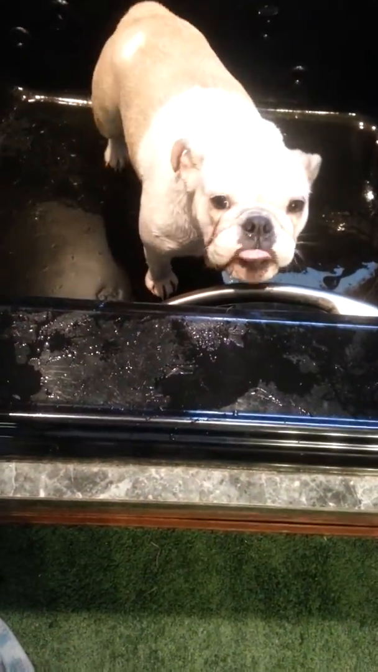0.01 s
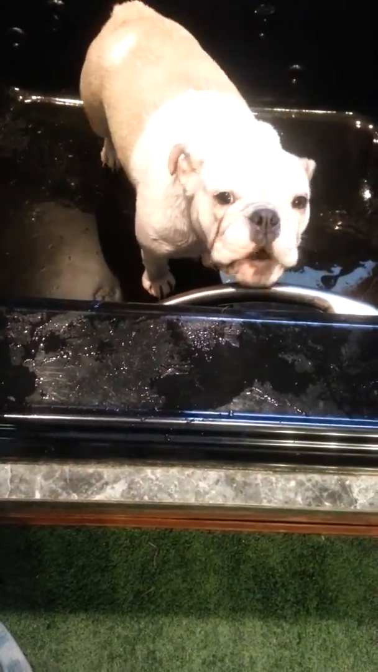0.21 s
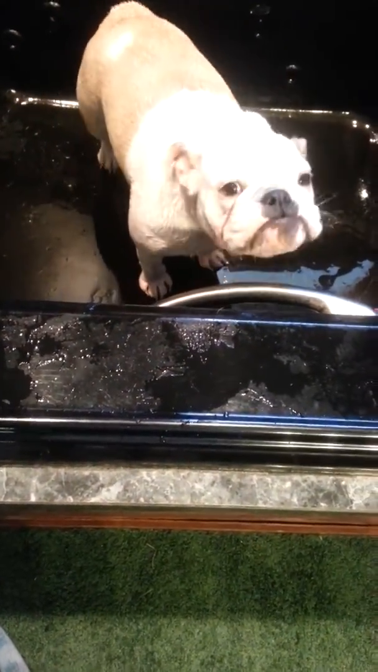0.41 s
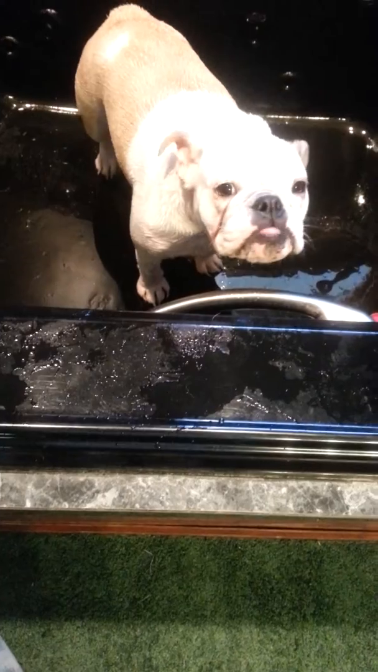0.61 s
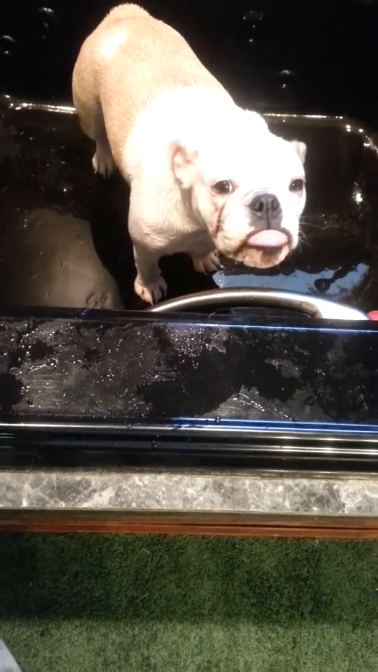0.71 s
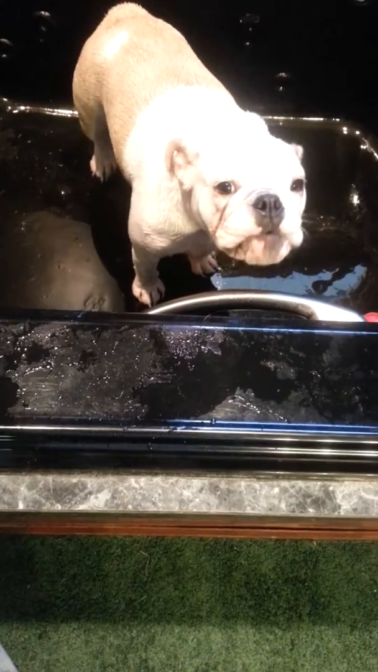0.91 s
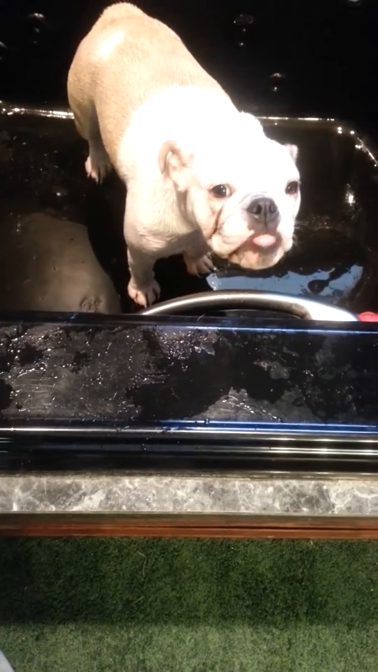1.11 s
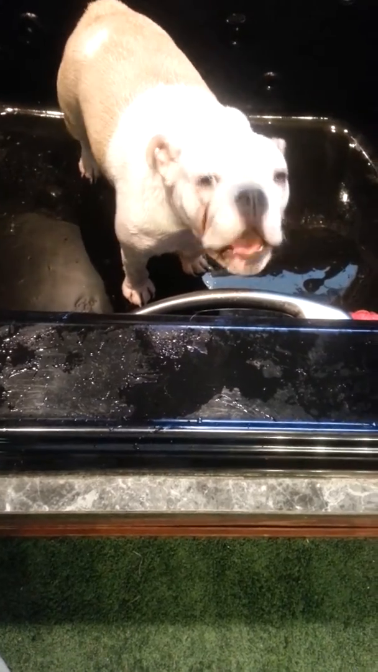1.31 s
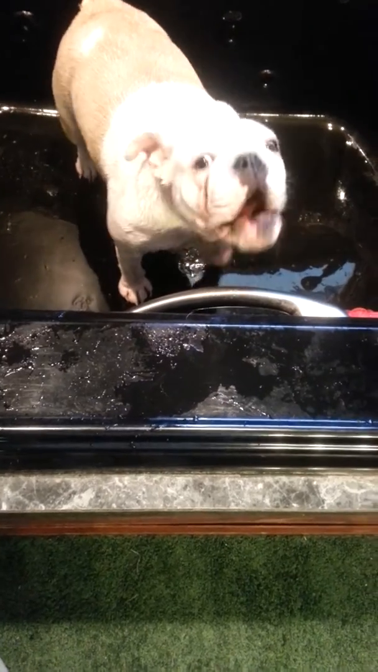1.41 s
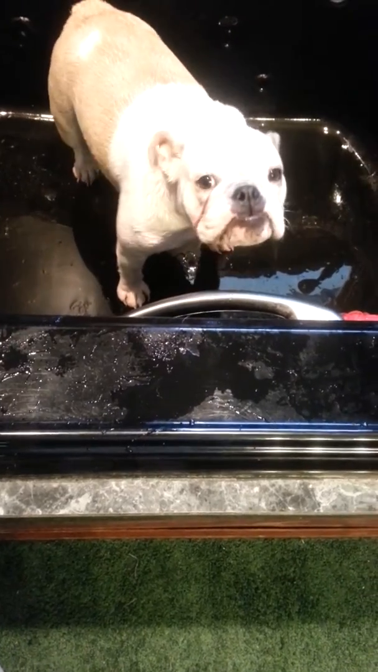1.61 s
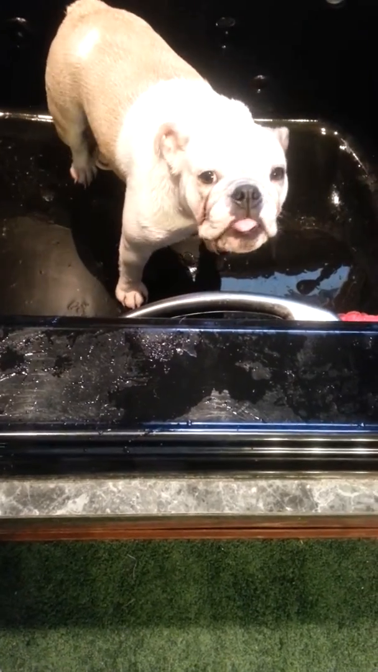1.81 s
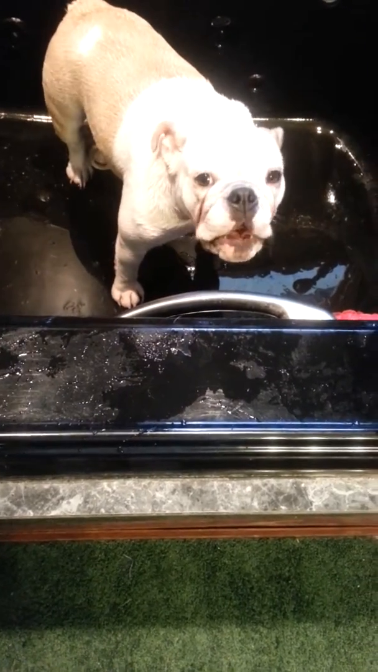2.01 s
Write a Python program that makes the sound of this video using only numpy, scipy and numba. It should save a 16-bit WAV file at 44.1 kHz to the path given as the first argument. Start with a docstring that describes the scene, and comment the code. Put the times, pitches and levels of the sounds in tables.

```python
"""In a hard-walled bathroom, a bulldog puppy yaps twice in a wet tub, close to a phone that overloads.
Each yap is a shrill, wavering tone beside a rasp of uneven pulses and air through throat resonances;
a falling squeal tops the first. Around the yaps, shaped noise makes huffs, nose whistles and paw rubs,
and decaying sines make bumps that set the tub ringing. A dense reverberant tail follows every sound,
over quiet room noise."""
import sys
import numpy as np
from scipy import signal
from scipy.fft import rfft, irfft
from scipy.io import wavfile
from numba import njit

SR = 44100
rng = np.random.default_rng(int(sys.argv[2]) if len(sys.argv) > 2 else 0)


def store_pcm(level_fs):
    """Save levels as 16-bit WAV."""
    pcm = np.round(np.clip(level_fs, -1, 1) * 32767).astype(np.int16)
    wavfile.write(sys.argv[1], SR, np.atleast_2d(pcm).T)


N = 92610  # samples, 2.1 s

# unsteadiness of the voice: pitch share, level spread, random points per second
JITTER, SHIMMER_DB, JITTER_HZ = 0.03, 5.5, 298.7
RASP_PAN_DB = 4  # left over right, for rasp and squeal


def undb(db):
    """Decibels to gain."""
    return 10 ** (np.asarray(db) / 20)


def unit(x):
    """Scale to rms 1."""
    return x / np.sqrt(np.mean(x ** 2) + 1e-18)


def pan(x, db):
    """Tip a sound to the left by db, as a level difference between the channels."""
    return x * undb(np.array([[db], [-db]]) / 2)


def band(x, hz, width):
    """One resonance, gain 1 at its centre."""
    b, a = signal.iirpeak(hz, hz / width, fs=SR)
    return signal.lfilter(b, a, x)


def steep_band(x, hz, width):
    """The same resonance twice in a row, for steeper sides."""
    return band(band(x, hz, width), hz, width)


@njit
def moving_band(x, hz, width):
    """A two-integrator resonance whose centre moves every sample, gain 1 at its centre."""
    y = np.empty(len(x))
    band_state, low_state = 0., 0.
    for i in range(len(x)):
        g = np.tan(np.pi * hz[i] / SR)
        damping = width / hz[i]
        v = (band_state + g * (x[i] - low_state)) / (1 + g * (g + damping))
        band_state = 2 * v - band_state
        low_state = low_state + 2 * g * v
        y[i] = damping * v
    return y


def highpass(x, order, hz):
    """Take away the bass below hz."""
    return signal.sosfilt(signal.butter(order, hz, "high", fs=SR, output="sos"), x)


def hiss(hz, width):
    """Steady noise in one steep resonance, rms 1."""
    return unit(steep_band(rng.standard_normal(N), hz, width))


def walk(rate):
    """Smooth chance: random points, rate per second, joined by straight lines."""
    return np.interp(np.arange(N) / SR * rate, np.arange(N), rng.standard_normal(N))


def colour(x, hz, gain):
    """Shape a spectrum by points on a log-frequency axis."""
    f = np.arange(x.shape[-1] // 2 + 1) * SR / x.shape[-1]
    curve = np.interp(np.log(f + 1), np.log(hz), gain)
    return irfft(rfft(x) * curve, x.shape[-1])


def swell(t, start, attack, decay):
    """Straight rise, then exponential fall."""
    rise = np.clip((t - start) / attack, 0, 1)
    return rise * np.exp(-np.maximum(t - start - attack, 0) / decay)


def hold(t, start, end):
    """Fade in and out over 48 ms each; a sound under 96 ms stays below full level."""
    return np.clip(np.minimum(t - start, end - t) / 0.048, 0, 1)


def ring(t, start, hz, decay):
    """One struck mode: a sine that starts at the blow and dies away."""
    age = np.maximum(t - start, 0)
    return np.sin(2 * np.pi * hz * age) * np.exp(-age / decay)


def yap(t, curve, throat, breathy, rough):
    """A wavering tone, and a rasp of uneven pulses and gated air that rings the sliding throat."""
    s, hz, tone_db, rasp_db = np.array(curve).T
    note, cycles = tone(t, s, hz, tone_db, rough)

    flaps = cycles * 0.5  # the rasp runs an octave below the tone
    pulses = np.diff(np.floor(flaps), prepend=0) * undb(SHIMMER_DB * walk(JITTER_HZ))
    air = rng.standard_normal(N) * np.exp(-(flaps % 1) / 0.4)  # strongest at each pulse
    source = unit(pulses) + breathy * unit(air)

    # a fixed hiss band, then resonances that slide for 61 ms from the third point of the curve
    rasp = undb(-19.5) * steep_band(source, 7740, 1680)
    jaw = np.clip((t - s[2]) / 0.061, 0, 1)
    for first, last, width, db in throat:
        centre = first + (last - first) * jaw
        once = moving_band(source, centre, 0.98 * width)
        rasp = rasp + undb(db) * moving_band(once, centre, 0.98 * width)
    rasp = unit(rasp) * undb(np.interp(t, s, rasp_db))

    voice = voiced(t, s) * (pan(note, -4.5) + pan(rasp, RASP_PAN_DB))
    return highpass(voice, 4, 379)


def tone(t, s, hz, db, rough):
    """A wavering note with a weak octave, returned with its count of cycles."""
    unsteady = 1 + rough * np.exp(-np.maximum(t - s[1], 0) / 0.022)  # extra roughness clears away
    pitch = np.interp(t, s, hz) * (1 + JITTER * unsteady * walk(JITTER_HZ))
    cycles = np.cumsum(pitch) / SR
    wave = np.sin(2 * np.pi * cycles) + undb(-17) * np.sin(4 * np.pi * cycles)
    shimmering = unit(wave * undb(SHIMMER_DB * walk(JITTER_HZ)))
    return shimmering * undb(np.interp(t, s, db)), cycles


def voiced(t, s):
    """The voice starts abruptly, in 3.5 ms, and lets go over the 34 ms after its last point."""
    return np.clip((t - s[0]) / 0.0035, 0, 1) * np.clip((s[-1] - t) / 0.034 + 1, 0, 1)


def squeal(t, waver):
    """A narrow, falling sine above the first yap's tone, which wavers on its own."""
    # shrill overtone: (time [s], pitch [Hz], level [dB])
    squeal_curve = [(0.261, 1859, -11.5), (.29, 1684, 4.5), (0.327, 1649, -11.5), (.385, 1585, -22)]
    s, hz, db = np.array(squeal_curve).T
    cycles = np.cumsum(np.interp(t, s, hz) * (1 + waver * walk(JITTER_HZ))) / SR
    line = unit(np.sin(2 * np.pi * cycles) * undb(SHIMMER_DB * walk(JITTER_HZ)))
    return pan(voiced(t, s) * line * undb(np.interp(t, s, db)), RASP_PAN_DB)


def huffs(t):
    """Short puffs and snuffles: swells of band noise, softened by the dog's jowls."""
    # air through nose and lips:
    # (start [s], attack [s], decay [s], level [dB], centre [Hz], width of each filter pass [Hz])
    puffs = [(0.119, 0.038, 0.029, -46.5, 1730, 3500), (0.196, 0.0011, 0.05, -36, 2240, 1790),
             (0.418, 0.068, 0.028, -23, 4440, 6000), (0.774, 0.0011, 0.02, -28, 4100, 8910),
             (0.782, 0.055, 0.073, -37, 2500, 4410), (0.936, .015, .025, -49, 3400, 5040),
             (1.299, 0.001, .025, -29.5, 4350, 2200), (1.519, 0.063, 0.029, -26.5, 5200, 4900),
             (1.656, 0.046, 0.034, -32, 5400, 7100), (1.67, 0.053, 0.011, -39, 1300, 580),
             (1.62, 0.1, 0.019, -37.5, 453, 162), (1.298, 0.00045, .018, -20.5, 865, 596)]
    air = 0
    for start, attack, decay, db, hz, width in puffs:
        air = air + undb(db) * swell(t, start, attack, decay) * hiss(hz, width)
    return signal.sosfilt(signal.butter(2, 10360, fs=SR, output="sos"), air)


def whistles(t):
    """Air whistling faintly in the dog's short nose: very narrow bands of noise."""
    # nose whistles: (start [s], end [s], pitch [Hz], level when fully faded in [dB])
    nose_notes = [(0.786, 0.855, 1696, -36.5), (0.88, 0.92, 2470, -37.5), (1.033, 1.296, 2530, -61.5)]
    return sum(undb(db) * hiss(hz, 130) * hold(t, start, end) for start, end, hz, db in nose_notes)


def bumps(t):
    """Soft knocks with a wet click; each has its own note and sets the tub's modes ringing."""
    # knocks of paws and jowls: (time [s], level [dB], ring [Hz], decay [s])
    knocks = [(0.025, -33.5, 550, 0.0024), (0.194, -28, 585, 0.017), (0.405, -27, 305, 0.018),
              (0.794, -35, 819, 0.025), (.817, -26.5, 752, 0.011), (0.877, -22.5, 568, 0.0099),
              (.957, -27.5, 437, 0.006), (1.03, -42.5, 256, 0.02), (1.486, -20.5, 299, 0.017)]
    # modes of the tub: (frequency before detuning [Hz], decay [s], level [dB])
    tub_modes = [(238, 0.0092, -9), (283, 0.024, -2.5), (450, 0.011, -7.5), (880, .014, -10.5)]
    tub_db, click_db = -4, -9  # against the knock's own note
    tub_detune = 0.079  # each place on the tub rings a little differently
    out = 0
    for start, db, hz, decay in knocks:
        tub = 0
        for mode_hz, fade, mode_db in tub_modes:
            detuned = mode_hz * (1 + tub_detune * rng.standard_normal())
            tub = tub + undb(mode_db) * ring(t, start, detuned, fade)
        click = hiss(3600, 4500) * swell(t, start, 0.00073, 0.0042)
        knock = ring(t, start, hz, decay) + undb(tub_db) * tub + undb(click_db) * click
        out = out + undb(db) * knock
    return highpass(out, 3, 170)


def rubs(t):
    """Faint groans of pads on the wet tub: noise in low bands, faded in and out."""
    # paw rubs: (start [s], end [s], pitch [Hz], width of each filter pass [Hz], level [dB])
    groans = [(0.795, 1.059, 268.4, 112, -42), (1.67, 2.15, 166.7, 44.4, -55),
              (1.888, 2.19, 640, 453, -59.5)]
    return sum(undb(db) * hiss(hz, width) * hold(t, start, end) for start, end, hz, width, db in groans)


def bathroom(x, t):
    """Direct sound reaches the right port first; dense reflections follow, alike in the bass only."""
    # reverberation by band: (centre [Hz], time to fall 60 dB [s], level [dB])
    room_bands = [(103, 0.043, -7.5), (288.4, 0.47, -7), (700, 0.41, -0.5), (1522, 0.39, 0),
                  (3217, 0.34, -0.5), (6000, 0.43, -8), (11800, 0.22, -1.5)]
    direct_db, wet_db = -2.5, -0.5
    port_lag_s, alike_hz = 0.00013, 447.4  # left port's delay; the channels differ fully above alike_hz
    hz, t60, db = np.array(room_bands).T
    mid, side = rng.standard_normal((2, N))
    tail = 0
    for k, own_band in enumerate(np.eye(len(hz))):
        apart = min(hz[k] / alike_hz, 1)
        pair = (mid + apart * side * np.array([[1], [-1]])) / np.hypot(1, apart)
        tail = tail + undb(db[k]) * colour(pair, hz, own_band) * np.exp(-np.log(1000) * t / t60[k])
    build = np.clip(t / 0.003, 0, 1)  # reflections gather over 3 ms
    tail = tail * build / np.sqrt(SR * t60.mean() / np.log(10 ** 6))  # level by the mean decay
    direct = np.array([np.interp(t - port_lag_s, t, x[0]), x[1]])
    reverb = signal.fftconvolve(x, tail, axes=1)[:, :N]
    return undb(direct_db) * pan(direct, 1) + undb(wet_db) * reverb


def floor():
    """Quiet room noise, partly shared by the channels, whose level drifts slightly."""
    # spectrum of the noise: (frequency [Hz], relative level per hertz [dB])
    floor_curve = [(30, -38.5), (80, -9.5), (200, -3.5), (500, -4), (1200, -10.5), (2800, -13.5),
                   (6000, -20), (14000, -24), (15500, -59)]
    hz, db = np.array(floor_curve).T
    noise = rng.standard_normal((2, N)) + rng.standard_normal(N)
    return undb(-54.5 + walk(10.0)) * unit(colour(noise, hz, undb(db)))


def scene():
    """Dog and tub in the bathroom, over the room noise."""
    # course of each yap: (time [s], pitch [Hz], tone level [dB], rasp level [dB])
    first_curve = [(0.239, 653.2, -13, -39), (0.24, 650.3, 9, -11.5), (.25, 623.1, 4.5, -2),
                   (.258, 585.4, -3.5, 9.5), (0.284, 570, -8, 4), (0.293, 804.6, 3.5, 0),
                   (0.319, 751.8, 5.5, -1), (0.346, 685.4, 2, -30), (0.403, 670.6, -10.5, -12.5)]
    second_curve = [(1.311, 700.6, -39, -30.5), (1.322, 654.7, -8, -26), (1.333, 639.6, 1.5, 7),
                    (1.344, 890, 1.5, 13), (1.381, 864.7, 0.5, 0.5), (1.414, 821, 6, -1.5),
                    (1.426, 703.3, -4.5, -6), (1.489, 734, -16.5, -11), (1.54, 700.8, -31.5, -20.5)]
    # throat resonances, which slide as the jaw moves:
    # (start [Hz], end [Hz], nominal width before narrowing [Hz], level [dB])
    first_throat = [(736, 790, 180, -1.5), (1150, 1290, 188, -7), (1890, 1632, 355, -2.5),
                    (2797, 3274, 427, -3), (5070, 4120, 1600, -15)]
    second_throat = [(834, 747, 264, -3), (1240, 1000, 256, -4), (2172, 1788, 310, -3),
                     (2403, 2297, 565, 0), (2882, 2905, 292, 0), (3150, 3330, 444, -3),
                     (4755, 4870, 670, -10.5)]
    t = np.arange(N) / SR
    first = yap(t, first_curve, first_throat, breathy=0.83, rough=0) + squeal(t, waver=0.026)
    second = yap(t, second_curve, second_throat, breathy=1.12, rough=1.8)
    dog = first + second + huffs(t) + whistles(t)
    return bathroom(dog + bumps(t) + rubs(t), t) + floor()


def record(dry):
    """The gain drops a moment late, peaks clip at full scale, and a steep low-pass ends the sound
    near 15.5 kHz."""
    agc_s, threshold_db, slope = 0.031, -12.5, 0.89  # automatic gain: averaging time, knee, strength
    keep = np.exp(-1 / (agc_s * SR))
    loudness = signal.lfilter([1 - keep], [1, -keep], np.minimum(np.abs(dry), 1).mean(axis=0))
    gain = np.hypot(1, loudness / undb(threshold_db)) ** -slope
    clipped = np.clip(dry * undb(2) * gain, -1, 1)
    return signal.sosfilt(signal.ellip(8, 0.2, 60, 15500, fs=SR, output="sos"), clipped)


dry = scene()
out = record(dry)
store_pcm(out)
```